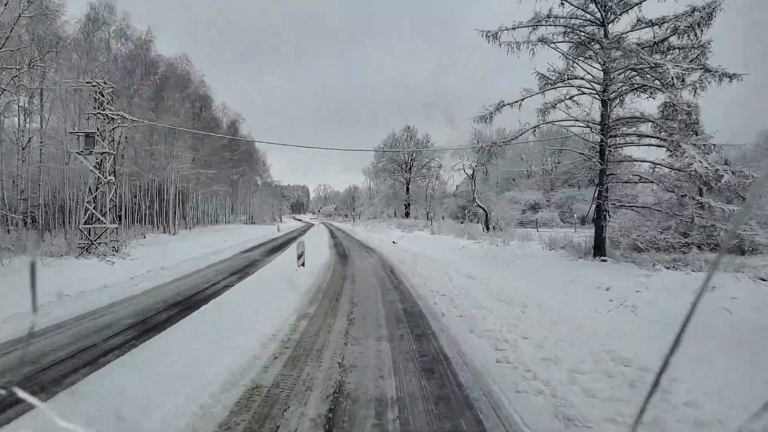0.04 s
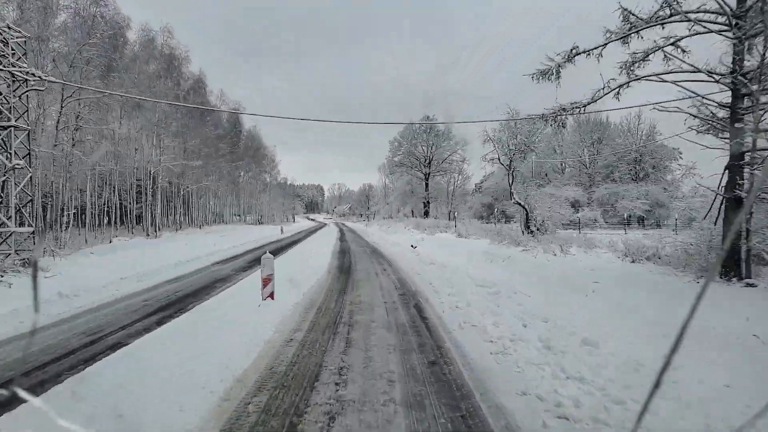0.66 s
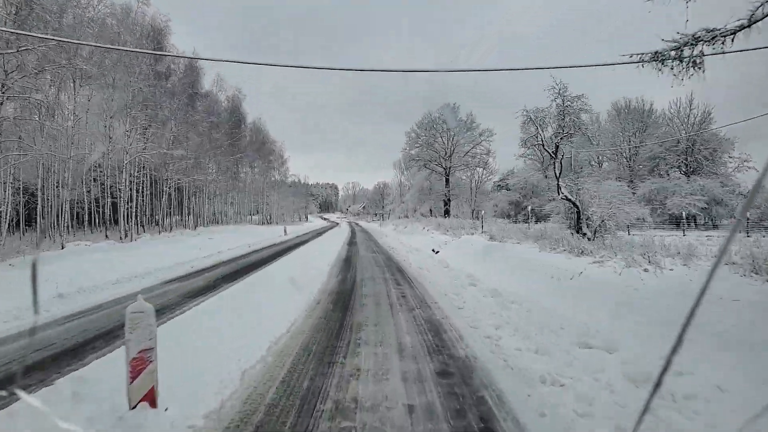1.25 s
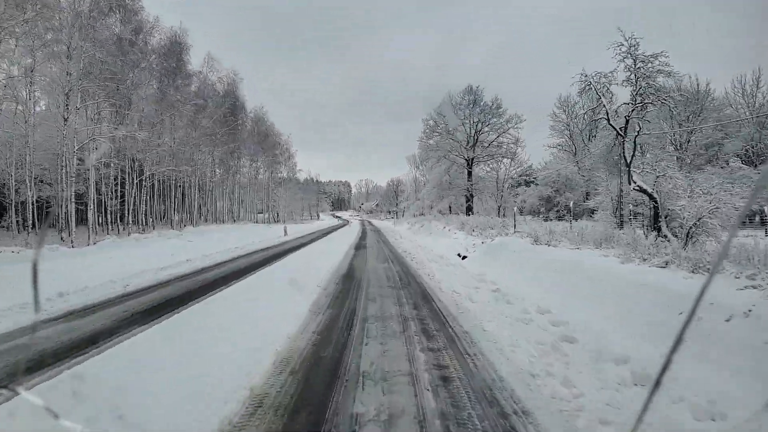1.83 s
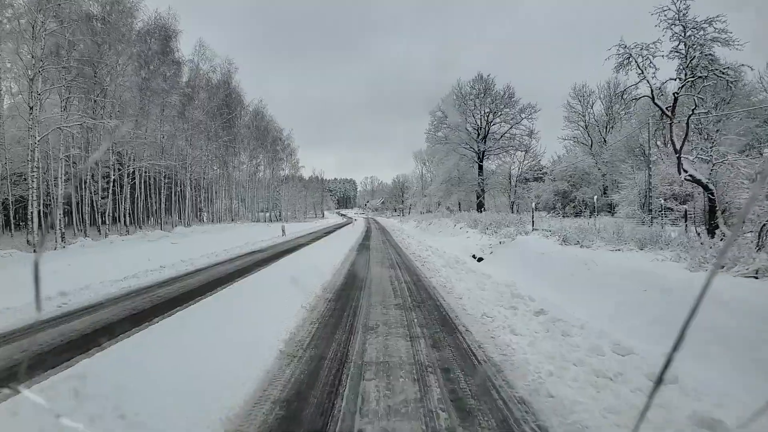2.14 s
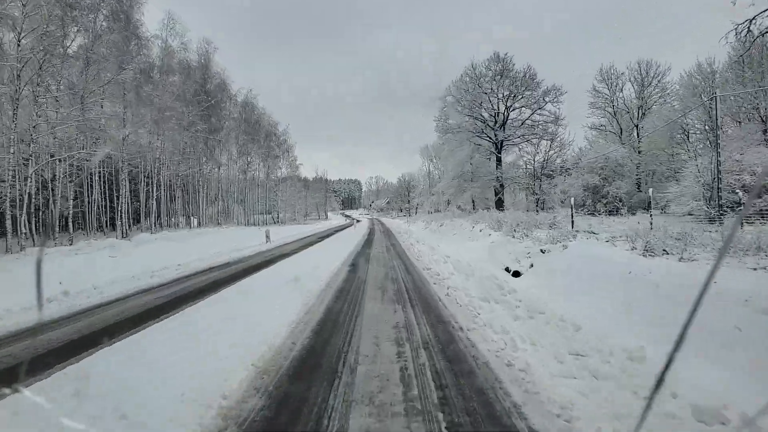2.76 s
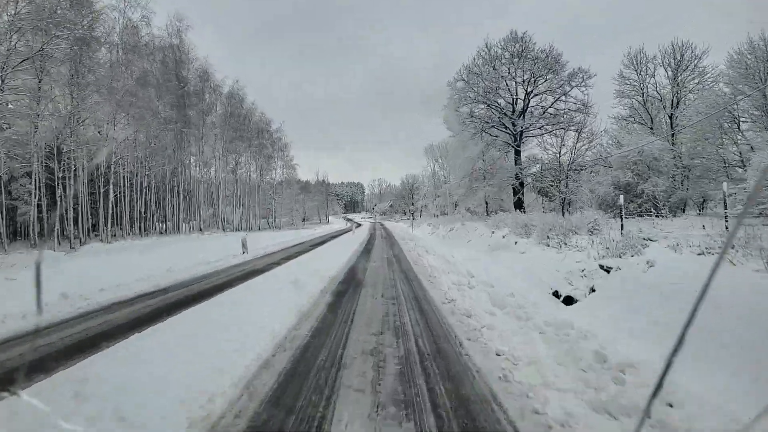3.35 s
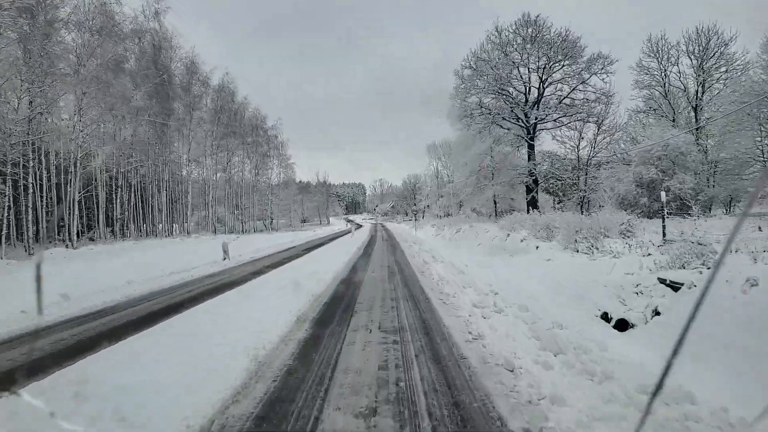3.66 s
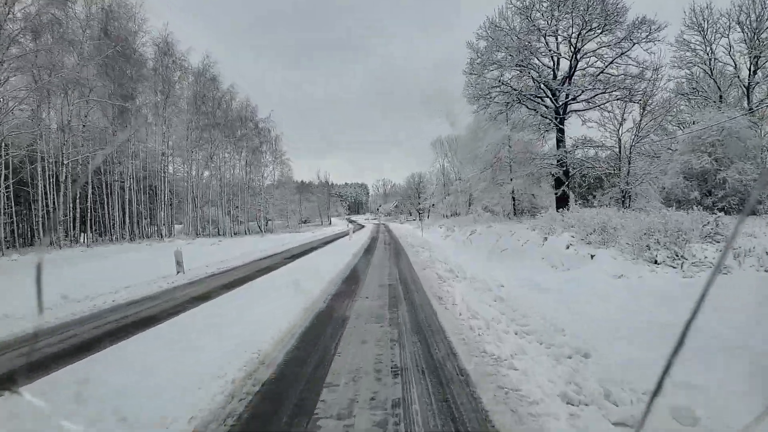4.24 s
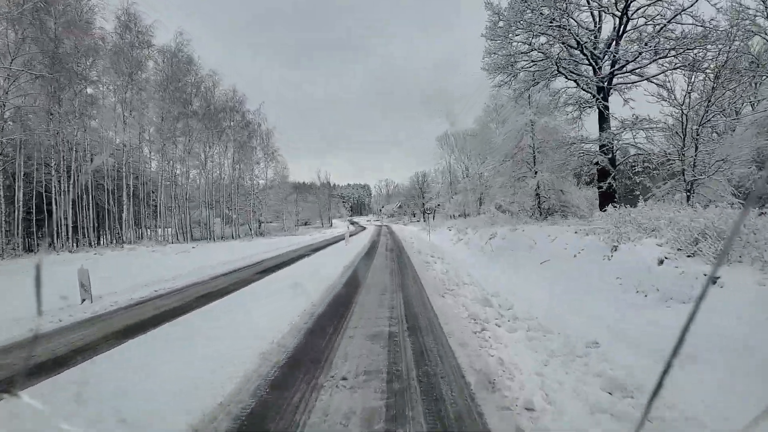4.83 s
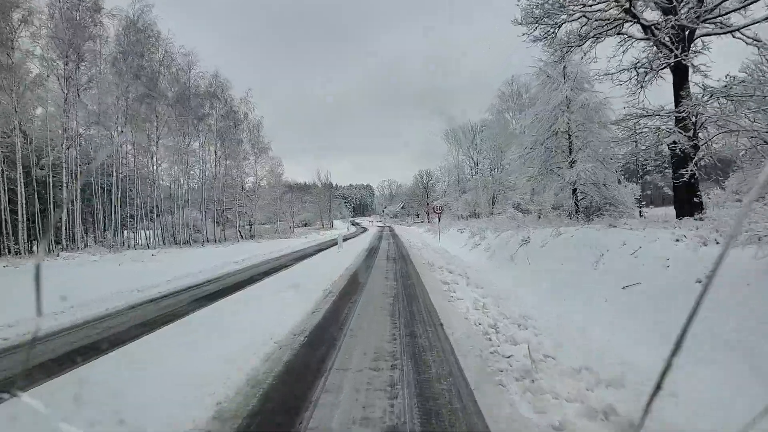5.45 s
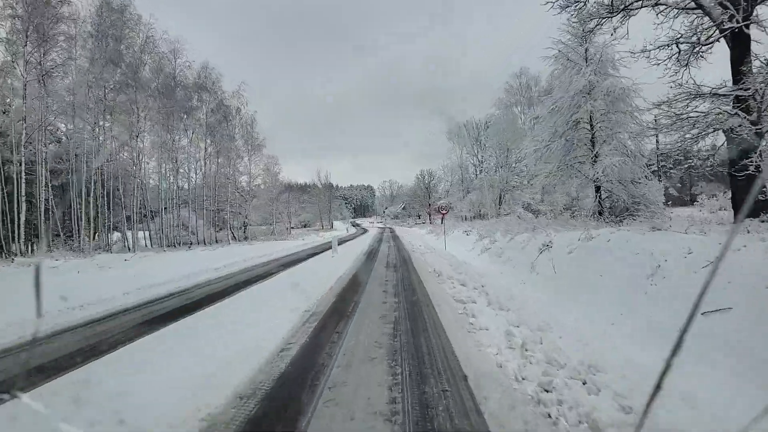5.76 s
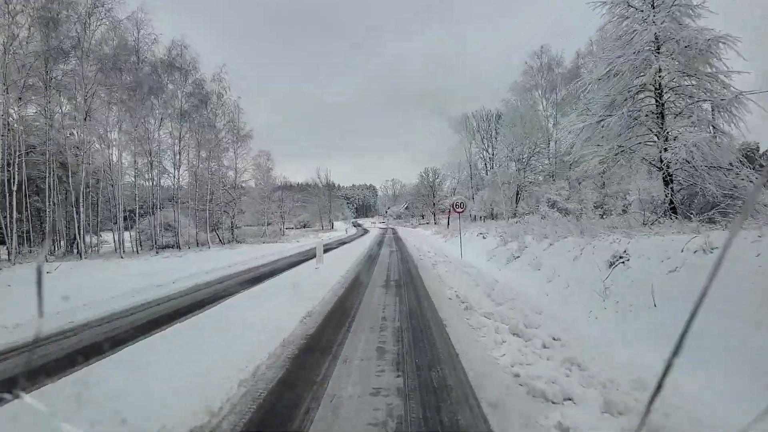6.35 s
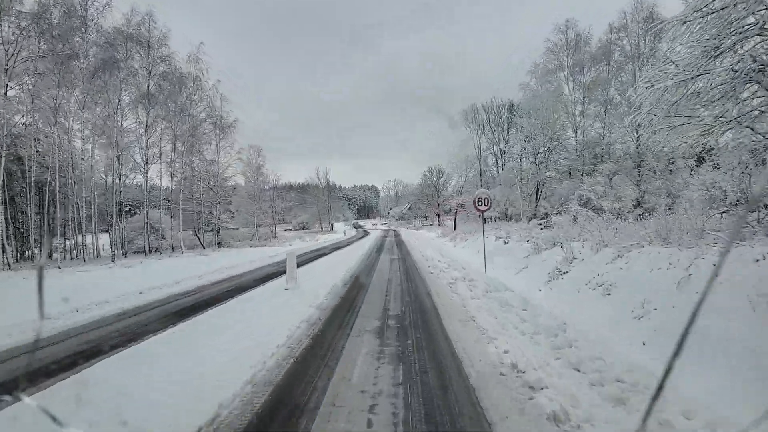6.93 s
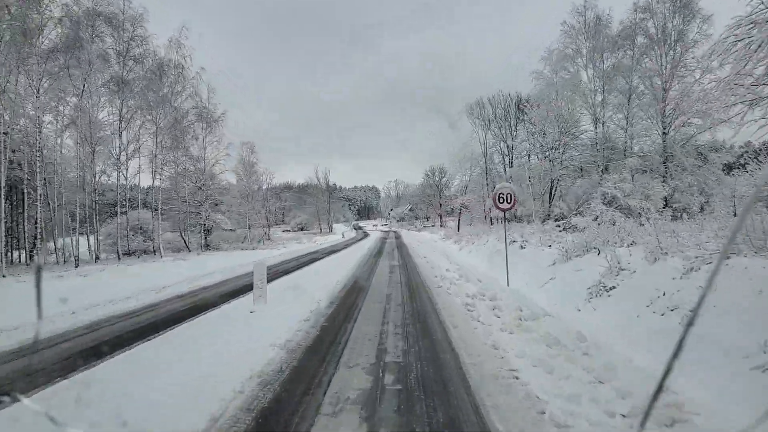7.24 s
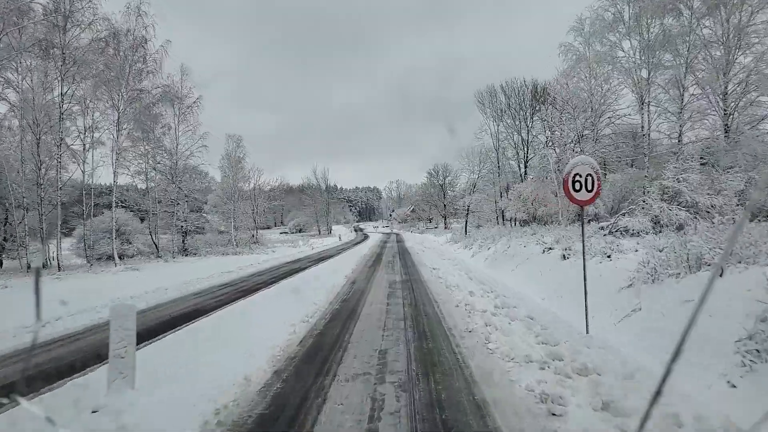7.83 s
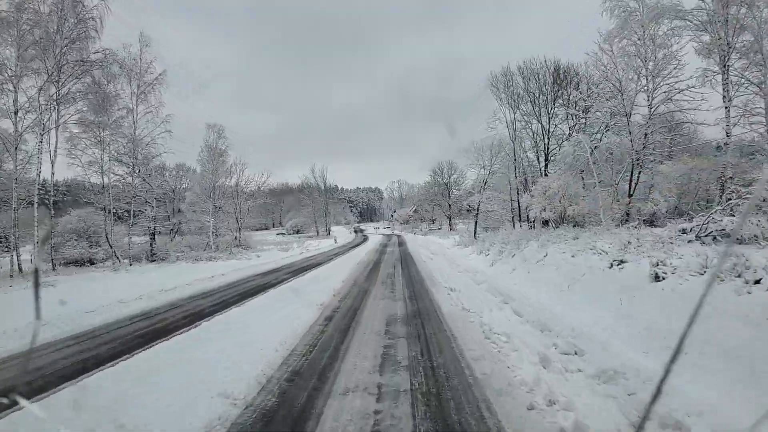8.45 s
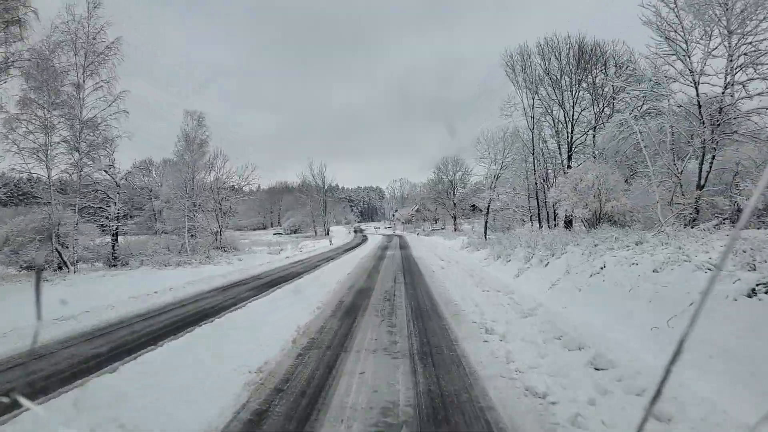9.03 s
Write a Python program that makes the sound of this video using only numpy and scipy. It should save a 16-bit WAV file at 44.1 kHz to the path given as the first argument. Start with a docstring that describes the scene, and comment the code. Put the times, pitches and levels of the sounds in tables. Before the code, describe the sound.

Steady tyre rumble, slush hiss and low diesel drone fill a van's cabin, with a faint turbo hiss under acceleration.

```python
"""Inside a diesel van on a snowy country road. From the start the tyres shake the cabin's air, slush and
wind hiss outside, and engine tones boom as they pass through resonances (pitches the cabin favours).
The pedal lifts at 0.7 s, and a plastic panel ticks once. A gentle push follows at 1.9 s, then the first
of three patches of rough snow. From 4.2 s the driver pushes harder: the engine clatters a little and the
turbo adds a fluttering hiss. After a brief let-up and a last push, the van coasts from 7.3 s."""
import sys
import numpy as np
from scipy import signal
from scipy.fft import rfft, irfft
from scipy.io import wavfile
from scipy.ndimage import uniform_filter1d

SR = 44100
rng = np.random.default_rng(int(sys.argv[2]) if len(sys.argv) > 2 else 0)


def wav_record(signal):
    """Record a signal, one row per channel, as 16-bit PCM in the file named by sys.argv[1]."""
    frames = np.transpose(np.atleast_2d(signal))
    bounded = np.clip(frames, -1, 1)
    # unit amplitude maps onto the largest positive 16-bit level
    quanta = np.round(bounded * 32767).astype(np.int16)
    wavfile.write(sys.argv[1], SR, quanta)


N = 405279
TIME = np.arange(N) / SR
FREQUENCIES = np.maximum(np.arange(N // 2 + 1) * SR / N, 1)


def from_db(db):
    """Turn decibels into a number to multiply by."""
    return 10 ** (np.asarray(db) / 20)


def unit_level(x):
    """Scale a signal so that its average level (rms) is 1."""
    return x / np.sqrt(np.mean(x ** 2) + 1e-20)


def over_hz(points):
    """Read a table at every frequency, joining its points on an octave scale."""
    hz, value = np.transpose(points)
    return np.interp(np.log(FREQUENCIES), np.log(hz), value)


def resonance_db(resonances):
    """The decibels that a set of resonances adds at every frequency."""
    return sum(db / (1 + 2 * ((FREQUENCIES - hz) / width) ** 2) ** 2 for hz, width, db in resonances)


def drift(rate_hz):
    """A smooth random wander of typical size 1, with up to about this many swings a second."""
    spectrum = rfft(rng.standard_normal(N))
    return unit_level(irfft(spectrum / (1 + (FREQUENCIES / rate_hz) ** 4), N))


def panned(x, left_db):
    """Make the left side this much louder than the right."""
    return x * from_db(np.array([[left_db], [-left_db]]) / 2)


# How much louder the left side is: (frequency [Hz], left minus right [dB])
BALANCE = [(60, .6), (170, -.8), (230, 3.5), (295, .3), (360, 2.5), (465, 6.5), (620, 0), (725, -3),
           (850, 2.5), (1400, 2.5), (3200, 2), (4300, -1), (5200, -6), (6000, -13.5), (6800, -16.5),
           (8000, 0), (9500, -5), (11500, -7), (14000, 1)]
# How alike the sides are; standing waves can make them opposite: (frequency [Hz], likeness [-1 to 1])
LIKENESS = [(100, .985), (200, .93), (400, .85), (520, .94), (735, .85), (775, .1), (825, -.75),
            (910, -.65), (1080, .1), (1240, -.62), (1400, -.55), (1750, .25), (2300, -.15), (3000, .05),
            (15000, 0)]
def cabin_noise(colour_db):
    """Stereo noise of level 1 filling the cabin: alike on both sides in the bass, unlike in the treble."""
    shared, opposed = rfft(rng.standard_normal((2, N)))
    alike = np.clip(over_hz(LIKENESS), -1, 1)
    pair = np.sqrt(1 + alike) * shared + np.sqrt(1 - alike) * opposed * [[1], [-1]]
    sides = from_db(over_hz(BALANCE) / 2 * [[1], [-1]])
    return unit_level(irfft(pair * sides / np.hypot(*sides) * from_db(colour_db), N))


def reflections(depth_db):
    """Short echoes off glass and trim put small peaks and dips in the treble, different on each side."""
    echoes = rng.standard_normal((2, N)) * (TIME > .004) * np.exp(-TIME / .015)
    treble_only = FREQUENCIES / (FREQUENCIES + 700)
    return depth_db * unit_level(rfft(echoes).real) * treble_only


# Tone colour of slush and wind through the glass: (frequency [Hz], relative level [dB])
HISS_COLOUR = [(500, -2), (880, 16), (1020, 8.5), (1600, 2.5), (3000, 0), (4150, -3.5), (4600, -7.5),
               (5400, -9.5), (6500, -13.5), (7000, -21.5), (7900, -31), (9400, -22.5), (11800, -23.5),
               (15700, -29.5)]
# Window and dashboard resonances: (frequency [Hz], width [Hz], lift [dB])
PANEL_RESONANCES = [(1143, 150, 2.5), (1408, 250, 6), (1777, 79, 4), (2146, 71, 4.5), (2380, 89, 2.5),
                    (2940, 150, 3.5), (3170, 58, 2), (3660, 90, 3.5), (4130, 69, 4.5)]
def slush_and_wind(level_db, flicker_db, ripple_db):
    """Spray and wind hiss on the glass, flickering slightly in level."""
    gain = from_db(level_db + flicker_db * drift(25))
    colour_db = over_hz(HISS_COLOUR) + resonance_db(PANEL_RESONANCES) + reflections(ripple_db)
    return gain * cabin_noise(colour_db)


# Tone colour of the tyres through the van's body: (frequency [Hz], relative level [dB])
RUMBLE_COLOUR = [(10, -36), (20, -23), (28, -9), (41, -12), (50, -1), (100, -2), (130, -7), (190, -9),
                 (300, -8), (410, -11), (560, -10), (750, -13), (810, -21), (2000, -85)]
# Resonances of the cabin's air and panels: (frequency [Hz], width [Hz], lift [dB])
CABIN_RESONANCES = [(60.5, 7.4, 5.5), (84, 15, 1.5), (150, 15, 4), (166.2, 20.4, 6), (221, 28, 4.5),
                    (246.4, 14.2, 10), (292, 49, 5), (364, 15, 1.5), (412, 12.6, -6), (464, 125, 4.5),
                    (720, 36, 3)]
def tyre_rumble(speed, level_db):
    """Tyres on packed snow shake the cabin, harder when faster; a speed of 1 is the average."""
    colour_db = over_hz(RUMBLE_COLOUR) + resonance_db(CABIN_RESONANCES)
    return from_db(level_db) * speed ** 0.44 * cabin_noise(colour_db)


# Rough stretches of packed snow: (middle time [s], length [s], level [dB], pitch [Hz])
ROUGH_PATCHES = [(2.7, .5, -22, 268), (4.468, 0.89, -24, 161), (7.35, .8, -25, 188)]
def rough_snow(width_octaves):
    """Each rough stretch shakes the cabin around its own pitch, swelling and fading smoothly."""
    out = np.zeros((2, N))
    for middle, length, db, hz in ROUGH_PATCHES:
        band_db = -20 * np.log10(1 + (np.log2(FREQUENCIES / hz) / width_octaves) ** 4)
        swell = np.exp(-(2 * (TIME - middle) / length) ** 2)
        out += from_db(db) * swell * cabin_noise(resonance_db(CABIN_RESONANCES) + band_db)
    return out


# The plastic trim's tick: (time [s], peak level [dB], pitch [Hz], time to fade by 60 dB [s])
TICKS = [(1.352, -18.5, 3900, .016)]
def trim_tick(left_db):
    """A plastic panel slips: a short burst of noise rings in one broad resonance."""
    out = np.zeros((2, N))
    for start, db, hz, fade_s in TICKS:
        age = np.maximum(TIME - start, 0)
        fade = (TIME >= start) * from_db(-60 * np.minimum(age / fade_s, 3))
        burst = rng.standard_normal((2, N)) * fade
        panel = signal.butter(2, [hz * .87, hz * 1.13], "band", fs=SR, output="sos")
        ring = signal.sosfilt(panel, signal.sosfilt(panel, burst))
        out += from_db(db) * ring / np.abs(ring).max()
    return panned(out, left_db)


def eased(control, seconds):
    """Round off a control's steps over this time, never going below zero."""
    return np.maximum(uniform_filter1d(control, max(int(seconds * SR), 1)), 0)


# Pushes on the pedal: (start [s], end [s], load [0-1], boost at start [0-1], boost at end [0-1])
PEDAL_PUSHES = [(0, .72, 0.82, .4, 0), (1.9, 4.2, .28, 0, 0), (4.2, 6.11, 0.9, 0.07, 0.83),
                (6.11, 6.48, 0.37, .3, .17), (6.48, 7.32, 1, 1, .1)]
def pedal():
    """Each push holds a load (how hard the engine works) while the boost (turbo pressure) glides."""
    load, boost = np.zeros((2, N))
    for start, end, push_load, first_boost, last_boost in PEDAL_PUSHES:
        held = (TIME >= start) & (TIME < end)
        to_go = np.interp(TIME, [start, end], [1, 0]) ** 1.8  # changes fastest at first
        load = np.where(held, push_load, load)
        boost = np.where(held, last_boost + (first_boost - last_boost) * to_go, boost)
    return eased(load, seconds=0.14), eased(boost, seconds=.03)


# Resonances of the engine's air intake pipe: (frequency [Hz], width [Hz], lift [dB])
PIPE_RESONANCES = [(4600, 120, 9), (4890, 110, 9), (5300, 50, 6)]
def turbo(boost, level_db, half_width_hz, flutter_db, surge_db, left_db):
    """A narrow, fluttering intake hiss grows and climbs with boost, through the pipe's resonances."""
    centre_hz = 4574 + 782 * boost
    angle = 2 * np.pi * np.cumsum(centre_hz) / SR
    hiss = np.array([drift(half_width_hz) * np.cos(angle) + drift(half_width_hz) * np.sin(angle)
                     for _ in range(2)])
    flutter = from_db(flutter_db * drift(70) + surge_db * drift(10))
    piped = irfft(rfft(hiss * flutter) * from_db(resonance_db(PIPE_RESONANCES)), N)
    return panned(from_db(level_db) * boost ** 0.55 * unit_level(piped), left_db)


# Tone colour of engine knock through the cabin's front wall: (frequency [Hz], relative level [dB])
CLATTER_COLOUR = [(500, -6), (1050, 2), (1380, 4), (1600, -3), (2200, 0), (3200, -7), (4100, -3),
                  (4650, -4), (5500, -15), (6700, -14), (7700, -42), (15000, -50)]
def clatter(firings, load, full_load_db, coasting_share, puff_depth):
    """Each firing of fuel gives a puff of knock that starts sharply and dies away, stronger under load."""
    puffs = unit_level(1 + puff_depth * np.exp(-np.pi * (firings % 1)))
    strength = coasting_share + (1 - coasting_share) * load
    return from_db(full_load_db) * strength * puffs * cabin_noise(over_hz(CLATTER_COLOUR))


def spinning_tone(firings, multiple, waver):
    """A turning part hums at a multiple of the firing rate, wavering as the van's body shakes."""
    angle = 2 * np.pi * (multiple * firings + rng.random())
    tone = (1 + waver * drift(4.8)) * np.sin(angle)
    timing_wobble = waver * drift(2.3) * np.cos(angle)
    return np.sqrt(2) * (tone + timing_wobble)


# Booming tones, three from the firing, three from the drive shafts, four gear whines:
# (pitch [times the firing rate])
BOOM_MULTIPLES = (1, 2, 3, 1.71, 2.25, 5.6, 19.97, 19.97, 22, 25)
# One row per booming tone: (level in resonance [dB], resonance [Hz], width [Hz], change at full load [dB])
BOOMS = [(-24, 56, 20, 1), (-21.5, 103, 7.1, -0.5), (-26.5, 164.4, 19, 1), (-20.5, 84, 5.1, -8),
         (-30.5, 124, 6.6, 4.5), (-29, 298.5, 19, -2), (-59, 1016, 26, 13.5), (-55, 1136, 14, 13),
         (-52, 1176, 17, 0), (-53, 1298, 18, 5)]
# Hums with no resonance: (pitch [times the firing rate])
HUM_MULTIPLES = (.56, 1.08, 1.5, 2.5, 3.5)
# One row per hum: (level when coasting [dB], change at full load [dB])
HUM_LEVELS = [(-40, -3), (-34, -3.5), (-33.5, 8), (-44, 6.5), (-39, 2)]
def engine(firing_hz, firings, load):
    """Every tone follows the engine's speed and changes level with load; booms swell near a resonance."""
    out = np.zeros(N)
    for multiple, (db, hz, width, load_db) in zip(BOOM_MULTIPLES, BOOMS):
        swell = 1 / np.hypot(1, 2 * (multiple * firing_hz - hz) / width)
        out += from_db(db + load_db * load) * swell * spinning_tone(firings, multiple, waver=0.11)
    for multiple, (db, load_db) in zip(HUM_MULTIPLES, HUM_LEVELS):
        out += from_db(db + load_db * load) * spinning_tone(firings, multiple, waver=0.27)
    return panned(out, left_db=1.5)


# Engine speed, which sinks, recovers under the hard pushes and sinks again: (time [s], firing rate [Hz])
ENGINE_SPEED = [(0, 56.8), (1, 55.3), (3, 51.5), (4, 50.1), (5, 49.5), (6, 50.3), (7.2, 51.6), (8, 50.2),
                (9.19, 48.3)]
def scene():
    """Engine, road and cabin together; the van stays in one gear, so road speed follows the engine."""
    firing_hz = np.interp(TIME, *np.transpose(ENGINE_SPEED))
    firings = np.cumsum(firing_hz) / SR  # how many so far
    load, boost = pedal()
    tones = engine(firing_hz, firings, load)
    knock = clatter(firings, load, full_load_db=-37, coasting_share=0.16, puff_depth=1.2)
    intake = turbo(boost, level_db=-41.5, half_width_hz=300, flutter_db=3.0, surge_db=2.0, left_db=-6.5)
    rumble = tyre_rumble(firing_hz / firing_hz.mean(), level_db=-18)
    hiss = slush_and_wind(level_db=-31.5, flicker_db=0.67, ripple_db=2.0)
    patches = rough_snow(width_octaves=0.29)
    return hiss + rumble + patches + trim_tick(left_db=6) + intake + knock + tones


def record(dry):
    """The sound fades in over 3 ms, and the treble above 15.7 kHz is cut steeply."""
    fade_in = np.minimum(TIME / .003, 1)
    treble_cut = signal.ellip(16, .1, 80, 15700, fs=SR, output="sos")
    return signal.sosfilt(treble_cut, dry * fade_in)


dry = scene()
out = record(dry)
wav_record(out)
```